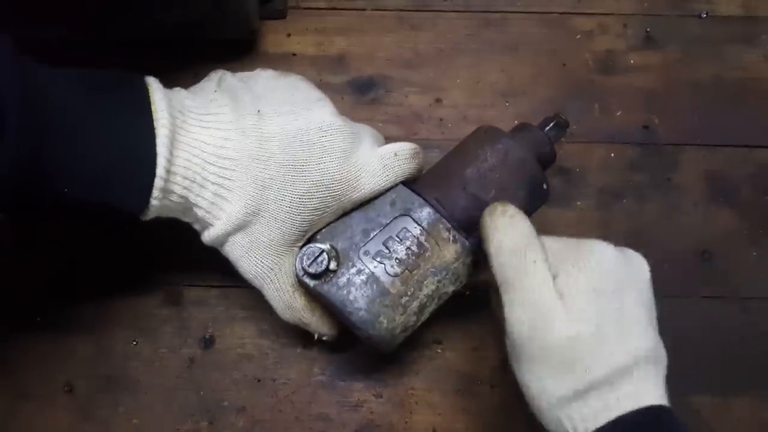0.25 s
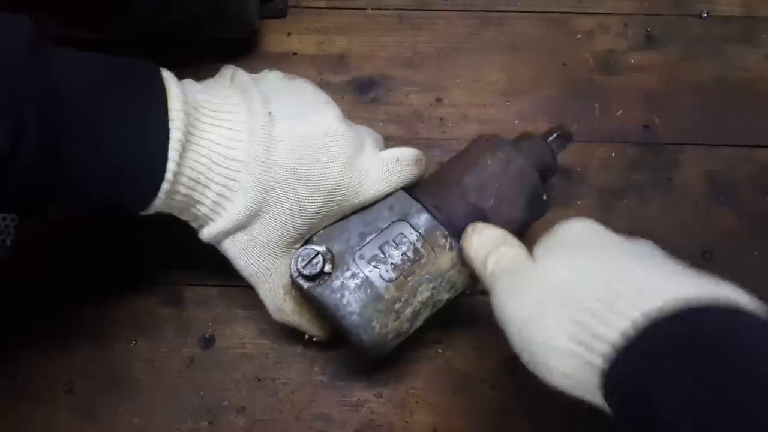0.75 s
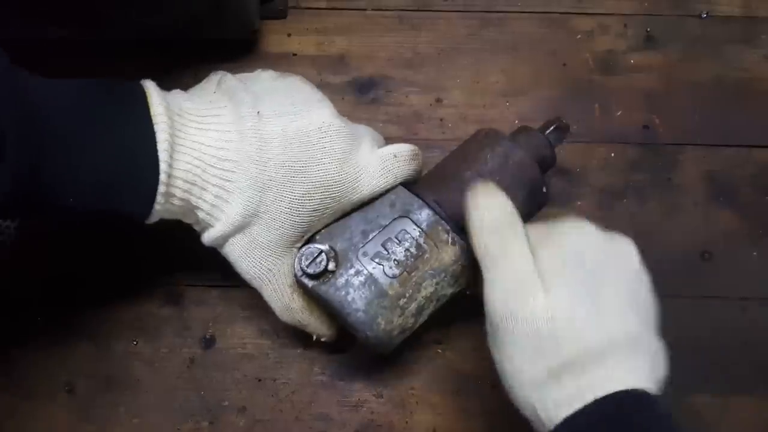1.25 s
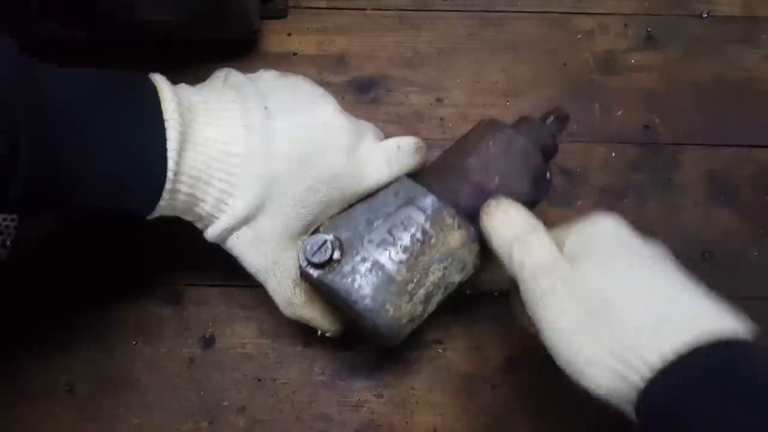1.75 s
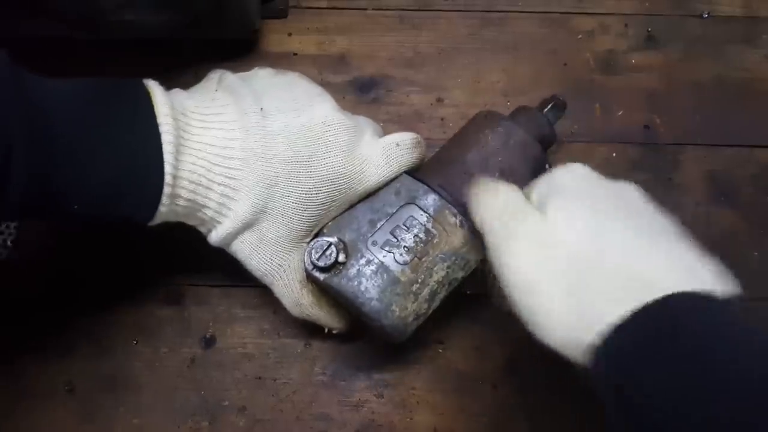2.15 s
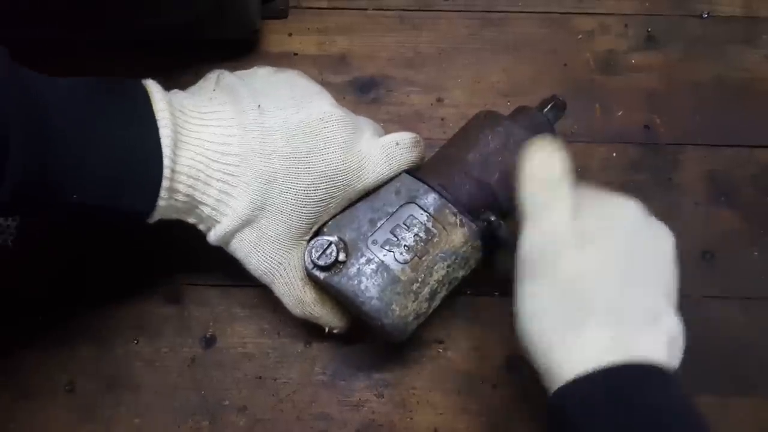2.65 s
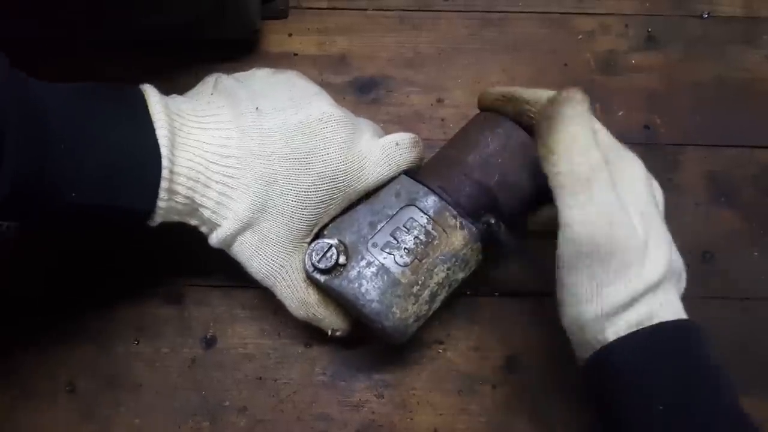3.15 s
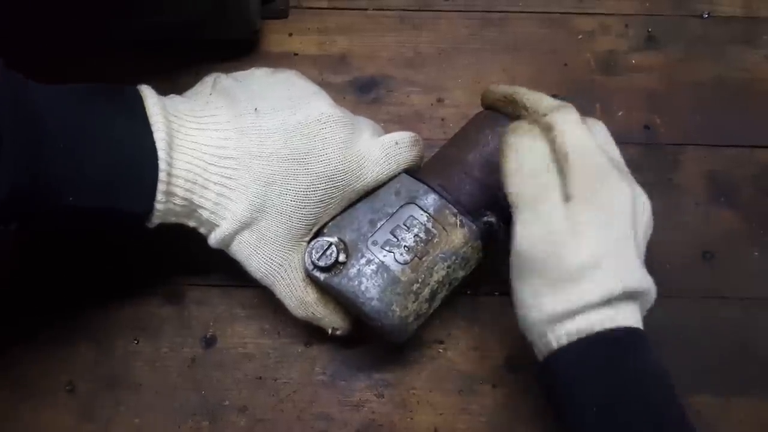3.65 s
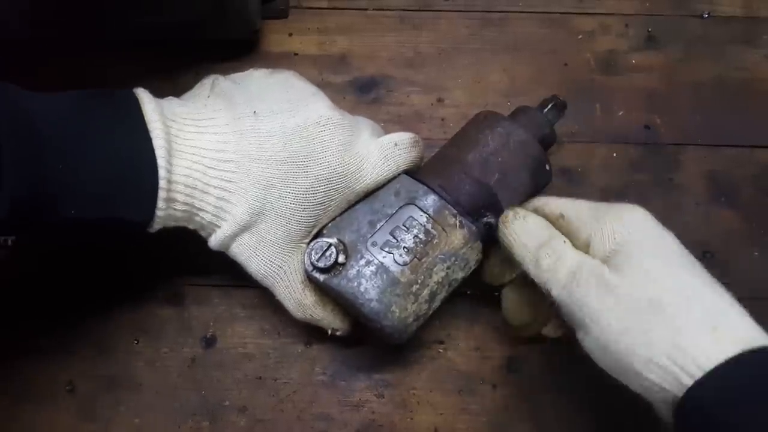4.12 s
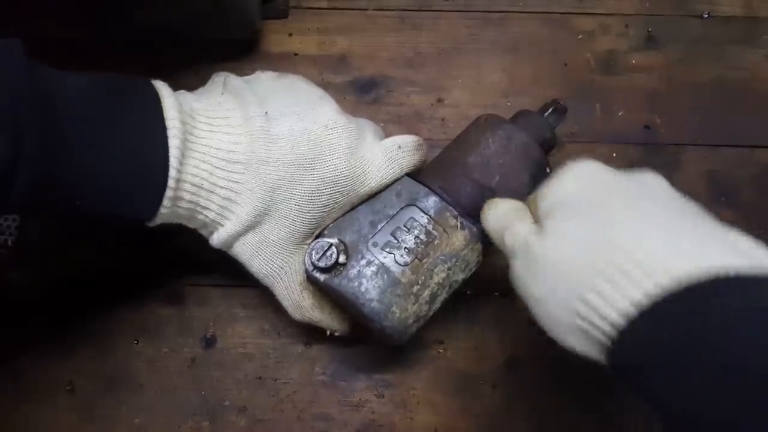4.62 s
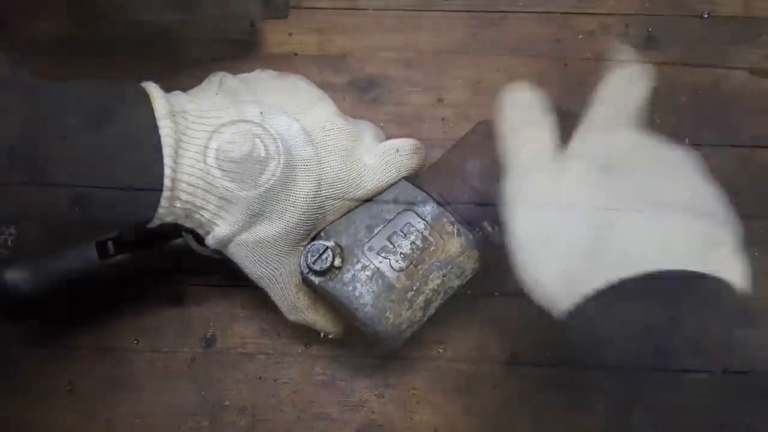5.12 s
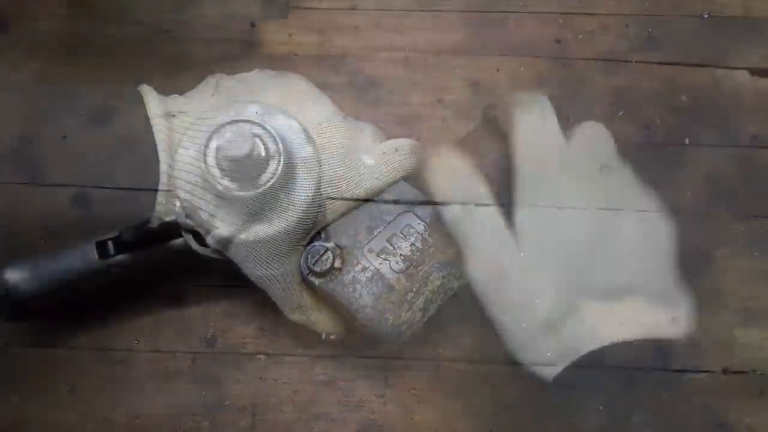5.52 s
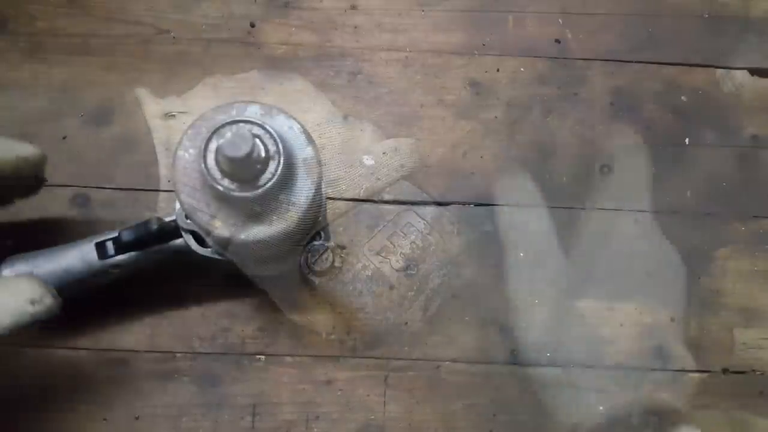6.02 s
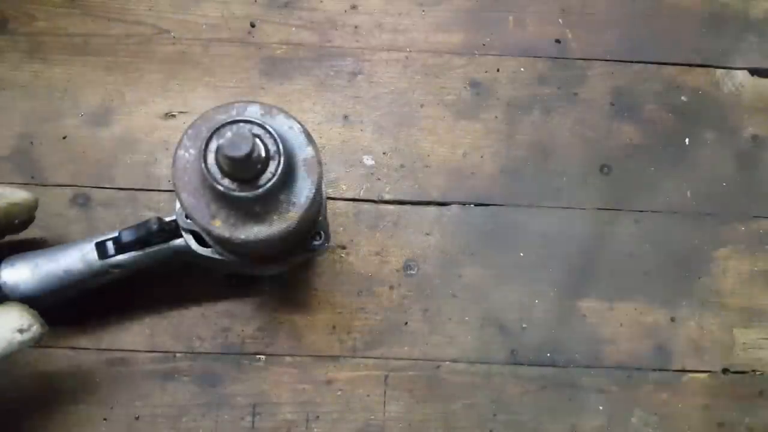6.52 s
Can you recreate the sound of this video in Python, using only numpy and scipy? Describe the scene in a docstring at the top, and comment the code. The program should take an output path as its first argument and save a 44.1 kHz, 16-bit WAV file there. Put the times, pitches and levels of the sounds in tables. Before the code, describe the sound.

A heavy rusty metal tool is handled on a wooden bench, heard close and slightly to the right. Cotton hiss and low gritty scraping run throughout, with dull bench thuds, dry ticks on metal and faint high squeaks. Two strong drops come in the first two seconds, the second clattering with loose steel; later activity thins, apart from a bright snap and a last drop, leaving quiet hum.

```python
"""Gloved hands pry at a rusty impact wrench on a wooden workbench, close to the microphone, for 6.8 seconds.
From the first moment mains hum and still air lie under rubbing gloves, grinding rust and a small tapping tool.
The wrench soon tips and drops; its second drop, just before 2 s, is the hardest and makes loose steel rattle.
Knocks, taps, snaps and squeaks go on; after a last drop at 4.5 s the work calms and the low hum swells.
Blows ring the modes of bench, housing and steel; rubbing is coloured noise, squeaks narrow noise, hum sines."""
import sys
import numpy as np
from scipy import signal
from scipy.io import wavfile

SR = 44100
rng = np.random.default_rng(int(sys.argv[2]) if len(sys.argv) > 2 else 0)


def generate_wav(signal):
    """Clip the signal to [-1, 1] and save it as 16-bit WAV at the path in sys.argv[1]."""
    frames = np.transpose(np.atleast_2d(signal))
    scaled = np.clip(frames, -1, 1) * 32767
    pcm = np.round(scaled).astype(np.int16)
    wavfile.write(sys.argv[1], SR, pcm)


N = 298557  # length in samples
CUTOFF_HZ = 15900  # nothing is kept above this pitch


def from_db(db):
    """Turn decibels into a gain."""
    return 10 ** (np.asarray(db) / 20)


def rms_one(x):
    """Scale a sound to unit power."""
    return x / np.sqrt(np.mean(x ** 2) + 1e-20)


def in_time(rows):
    """Read a table of (time, value) at every sample, with straight lines between its points."""
    return np.interp(np.arange(N) / SR, *np.transpose(rows))


def at_hz(points, hz):
    """Read a table of (pitch, value) on a log-frequency axis."""
    freqs, values = np.transpose(points)
    return np.interp(np.log(hz), np.log(freqs), values)


def pan(x, right_db):
    """Lean a sound to the right: the right side is louder than the left by right_db."""
    return x * from_db(np.array([[-right_db], [right_db]]) / 2)


def drift(rate):
    """Wander by chance with spread 1, heading for a new random value `rate` times a second."""
    knots = rng.standard_normal(4000)
    return rms_one(np.interp(np.arange(N) / SR * rate, np.arange(len(knots)), knots))


def swell(start, length):
    """A stroke rises and falls like half a sine."""
    t = np.arange(N) / SR - start
    during = (t > 0) & (t < length)
    shape = np.zeros(N)
    shape[during] = np.sin(np.pi * t[during] / length)
    return shape


def ring(force, hz, t60):
    """One mode: a unit click sets a sine of height 1 ringing, which falls 60 dB in t60 seconds."""
    radius = from_db(-60 / (t60 * SR))
    angle = 2 * np.pi * hz / SR
    return signal.lfilter([0, np.sin(angle)], [1, -2 * radius * np.cos(angle), radius ** 2], force + 1e-18)


def body(force, modes):
    """An object rings in all its modes at once, neighbours in opposite phase."""
    return sum((-1) ** k * from_db(db) * ring(force, hz, t60) for k, (hz, db, t60) in enumerate(modes))


def contacts(rows, size=2048, order=2):
    """Force pulses from (s, dB, cut-off Hz): the softer the contact, the lower its cut-off and the wider the pulse."""
    force = np.zeros(N + size)
    click = signal.unit_impulse(size)
    for s, db, hz in rows:
        at = max(0, round(s * SR))
        low_pass = signal.butter(order, min(hz, SR / 2 - 1), fs=SR)
        force[at:at + size] += from_db(db) * signal.lfilter(*low_pass, click)
    return force[:N]


# how alike left and right are in noise and reflected sound: pitch_hz, likeness (0 unrelated, 1 the same)
LIKENESS = [(60, 0.52), (200, 0.91), (400, 0.8), (800, 0.192), (2000, 0), (6000, 0.2), (15000, 0)]


def noise_bands(length):
    """Half-octave bands of stereo noise, much alike in the bass and nearly unrelated in the treble."""
    edges = 22 * 2 ** np.arange(0, 9.6, .5)
    white = rng.standard_normal((2, 2, length))
    for k, (low, high) in enumerate(zip(edges, edges[1:])):
        band_pass = signal.butter(2, [low, high], "band", fs=SR, output="sos")
        # neighbouring bands come from separate noises
        mid, side = signal.sosfilt(band_pass, white[k % 2])
        hz = np.sqrt(low * high)
        alike = np.clip(at_hz(LIKENESS, hz), -1, 1)
        yield hz, np.sqrt((1 + alike) / 2) * mid + np.sqrt((1 - alike) / 2) * np.array([side, -side])


def coloured(spectrum, shift_db, shift_rate=14):
    """Stereo noise of a given colour and unit power, whose bands each wander on their own."""
    return rms_one(sum(band * from_db(at_hz(spectrum, hz) + shift_db * drift(shift_rate))
                       for hz, band in noise_bands(N)))


# how long the dense ringing takes to fall 60 dB: pitch_hz, t60_s
RING_T60 = [(60, 0.52), (220, 0.28), (600, 0.31), (2000, 0.23), (6000, 0.4), (14000, 0.36)]


def diffuse(x, colour, build_s):
    """Countless weak resonances and reflections build up, then die away band by band."""
    t = np.arange(SR) / SR
    tail = sum(band * from_db(at_hz(colour, hz) - 60 * t / at_hz(RING_T60, hz))
               for hz, band in noise_bands(SR))
    build_up = 1 - np.exp(-t / build_s)
    return signal.fftconvolve(x[None], tail * build_up, axes=1)[:, :N]


# colour of the sound that the workshop sends back: pitch_hz, level_db
WORKSHOP = [(200, -41), (1000, -38.5), (3000, -35), (6000, -37), (9000, -45), (15000, -62.5)]


def workshop(x, build_s):
    """The workshop answers a sound with a dense, fading tail."""
    return diffuse(x, WORKSHOP, build_s)


# tones of the mains hum: pitch_hz, level_db (rms, before panning)
HUM = [(100, -69), (400, -83.5), (500, -78), (900, -84.5), (1001, -84), (1400, -92.5), (1501, -81.5),
       (2002, -88), (2600, -88.5), (2702, -86.5)]
# swell of the lowest hum tone: time_s, change_db
HUM_SWELL = [(0, 2), (5.9, -0.5), (6.3, 3.5), (6.75, 3.5)]
# colour of the still air: pitch_hz, level_db (per Hz, only the shape counts)
AIR = [(25, -14), (60, 3), (110, -11.5), (200, -9), (300, -23.5), (700, -16.5), (1500, -18), (2800, -19.5),
       (4500, -28.5), (8000, -38), (15500, -35)]
AIR_DB, AIR_SHIFT_DB = -68.5, 1.2  # rms level before panning; how far the colour wanders


def background():
    """Mains hum is a row of steady sines over the noise of still air; its lowest tone swells near the end."""
    t = np.arange(N) / SR
    tones = []
    for hz, db in HUM:
        level = np.sqrt(2) * from_db(db + 1.4 * drift(9.9))
        tones.append(level * np.sin(2 * np.pi * (hz * t + rng.random())))
    hum = tones[0] * from_db(in_time(HUM_SWELL)) + sum(tones[1:])
    air = from_db(AIR_DB) * coloured(AIR, AIR_SHIFT_DB)
    return pan(hum + air, right_db=4.0)


# how hard the hands work the wrench against the bench: time_s, effort_db (above the usual)
EFFORT = [(0, 5.5), (.17, 1.5), (.31, 3.5), (.38, -13.5), (.66, 2.5), (.76, -0.5), (.84, 14), (.97, 12),
          (1.08, -7.5), (1.36, 7.5), (1.56, -5.5), (1.82, -0.5), (2.1, 10.5), (2.3, -3), (2.45, -3.5),
          (2.52, 7.5), (2.72, 1), (2.95, 2), (3.25, 2), (3.65, -10), (4.05, 0), (4.45, -6.5), (4.62, 4.5),
          (5.18, -10.5), (5.35, -1), (5.9, -8.5), (6.0, -15.5), (6.77, -7.5)]


def effort_db(s):
    """Effort above the usual, at the given times."""
    return np.interp(s, *np.transpose(EFFORT))


# a glove slides over the wrench: start_s, length_s, hiss_db (before the final trim)
STROKES = [(0.482, 0.052, -59.5), (0.521, 0.12, -68.5), (0.984, 0.21, -63.5), (1.534, 0.15, -64),
           (2.107, 0.22, -76), (2.53, 0.2, -68), (2.681, 0.15, -52.5), (2.775, 0.23, -57),
           (3.006, 0.2, -74), (3.2, 0.29, -66.5), (3.737, 0.14, -60), (3.872, 0.28, -62.5),
           (4.233, 0.093, -50), (4.966, 0.16, -71.5), (5.992, 0.13, -74.5), (6.544, 0.24, -76)]
# colour of the cotton gloves: pitch_hz, level_db (per Hz, only the shape counts)
GLOVE = [(700, -18.5), (1400, -1), (3100, 16), (5000, 12), (8000, 15), (10000, 3.5), (13500, 3),
         (15500, -6)]
# colour of the grinding rust: pitch_hz, level_db (per Hz, only the shape counts)
RUST = [(50, -8), (130, 8.5), (220, 3), (300, 3), (450, 0.5), (700, -8), (1200, -9), (2500, -14.5),
        (5000, -39.5)]
GLOVE_SHIFT_DB, RUST_SHIFT_DB = 2.0, 4.0  # how far each colour wanders
# levels before the final trims: at the usual effort, and how much of the effort's swing each follows
RUSTLE_DB, RUSTLE_FOLLOWS = -72, 0.31
GRIND_DB, GRIND_FOLLOWS = -64.5, 1.15
STROKE_GRIND_DB = -4.5  # grinding that a stroke brings, against its hiss, before the trims
# after a drop the wrench skids: hiss and grinding against the force of the drop, before the trims
SKID_HISS_DB, SKID_GRIND_DB, SKID_S = -51, -39.5, 0.095


def friction(fibre_db=2.0, grit_db=3.0):
    """Cotton hisses as its fibres catch; rust grinds lower and coarser; both follow effort, strokes and skids."""
    effort = effort_db(np.arange(N) / SR)
    sliding = sum(from_db(db) * swell(start, length) for start, length, db in STROKES)
    skidding = sum(from_db(db) * swell(s, SKID_S) for s, db, *rest in DROPS)

    hiss = from_db(RUSTLE_DB + RUSTLE_FOLLOWS * effort)
    hiss = hiss + sliding + from_db(SKID_HISS_DB) * skidding
    grind = from_db(GRIND_DB + GRIND_FOLLOWS * effort)
    grind = grind + from_db(STROKE_GRIND_DB) * sliding + from_db(SKID_GRIND_DB) * skidding

    # fast random flicker makes the fibres and the grit
    gloves = rms_one(coloured(GLOVE, GLOVE_SHIFT_DB) * from_db(fibre_db * drift(270)))
    rust = rms_one(coloured(RUST, RUST_SHIFT_DB) * from_db(grit_db * drift(120)))
    # the final trims
    gloves_out = gloves * hiss * from_db(-2.5)
    rust_out = rust * grind * from_db(4.5)
    return pan(gloves_out, right_db=3.0) + pan(rust_out, right_db=2.5)


# sticking surfaces squeak: start_s, length_s, pitch_hz, width_hz, level_db
SQUEAKS = [(0.212, 0.12, 7780, 350, -73), (0.489, 0.043, 634, 108, -53.5), (1.272, 0.13, 7770, 350, -70.5),
           (1.85, 0.043, 7650, 350, -69), (2.473, 0.12, 7620, 340, -75), (2.575, 0.31, 388, 140, -56.5),
           (3.796, 0.079, 407, 40.3, -54.5), (3.801, 0.054, 1090, 400, -59.5),
           (4.497, 0.29, 7800, 356, -74), (5.56, 0.13, 7900, 353, -78.5)]


def squeaks():
    """Uneven stick and slip, as noise, drives one narrow resonance that swells and fades with the stroke."""
    out = 0
    for start, length, hz, width, db in SQUEAKS:
        resonance = signal.butter(2, [hz - width / 2, hz + width / 2], "band", fs=SR, output="sos")
        stroke = swell(start, length)
        tone = signal.sosfilt(resonance, rng.standard_normal(N))
        out = out + from_db(db) * stroke * tone / tone[stroke > 0].std()
    return pan(out, right_db=8.5)


# the steel tip slips off an edge: time_s, force_db
SNAPS = [(0.7778, -35), (0.7940, -39), (0.926, -43), (1.151, -46.5), (1.8906, -42), (2.049, -50.5),
         (2.5912, -45), (3.936, -45.5), (4.2736, -22), (4.5395, -46.5)]
# ringing modes of the tip: pitch_hz, level_db, t60_s
TIP = [(2380, -8, 0.0071), (5325, -3.5, 0.014), (5900, -5, 0.013), (6640, -7, 0.011), (7830, -4.5, 0.028),
       (8650, -6.5, .02), (11700, -15, 0.011)]


def snaps(contact_hz=14000, crunch_s=0.0008, ring_growth=0.33):
    """The tip lets go with a bright, short ring as rust crumbles for a moment; light slips ring relatively less."""
    hardest_db = max(db for s, db in SNAPS)
    force = contacts([(s, db, contact_hz) for s, db in SNAPS])
    ringing = contacts([(s, db + ring_growth * (db - hardest_db), contact_hz) for s, db in SNAPS])

    # each slip sets off a tiny burst of fading noise
    t = np.arange(SR // 20) / SR
    crumbs = rng.standard_normal(SR // 20) * np.exp(-t / crunch_s)
    bright = signal.butter(2, [2400, 13000], "band", fs=SR)
    crunch = signal.lfilter(*bright, signal.fftconvolve(force, crumbs)[:N])

    dry = body(ringing, TIP) * from_db(-2) + crunch * from_db(-2)
    return pan(dry, right_db=8.0) + workshop(dry, build_s=0.0042) * from_db(-7.5)


# the tool taps the rusty housing, which passes a thud on to the bench:
# time_s, tick_force_db, contact_cutoff_hz, thud_force_db
TAPS = [(0.0839, -38.5, 3720, -30.5), (0.29, -34.5, 2580, -36), (0.6313, -41, 4000, -34.5),
        (0.816, -23, 1360, -46), (1.139, -42, 3500, -29), (1.323, -43, 2960, -29.5),
        (1.3946, -28.5, 3170, -27), (1.7807, -39.5, 2330, -35.5), (1.862, -46.5, 3020, -53),
        (2.360, -48, 2510, -33.5), (2.563, -36.5, 2530, -47), (3.306, -41.5, 2500, -58),
        (3.5228, -46, 3020, -32.5), (3.6738, -31.5, 1103, -45), (4.7299, -44.5, 2420, -54),
        (5.659, -45, 897, -46), (5.698, -53.5, 2520, -39.5)]
# ringing modes of the housing: pitch_hz, level_db (before a common trim), t60_s
HOUSING = [(830, -1, 0.00887), (1090, -4, 0.021), (1600, 0, 0.0055), (2380, -3, 0.012),
           (3160, -0.5, 0.0067), (4500, 4, 0.0048)]


def taps(spot_db=2.5):
    """Dry ticks on the housing, damped by the hand that holds it; each spot favours other modes."""
    spots = spot_db * rng.uniform(-1, 1, (len(TAPS), len(HOUSING)))
    dry = 0
    for k, (mode_hz, mode_db, t60) in enumerate(HOUSING):
        rows = [(s, db + spot, hz) for (s, db, hz, thud_db), spot in zip(TAPS, spots[:, k])]
        force = contacts(rows, order=3)
        dry = dry + (-1) ** k * from_db(mode_db - 6.0) * ring(force, mode_hz, t60)
    return pan(dry + workshop(dry, build_s=0.0014) * from_db(3.4), right_db=7.5)


# ringing modes of the loose steel parts: pitch_hz, level_db (before a common trim), t60_s
LOOSE_PARTS = [(1336, -3, .16), (1580, -5, .1), (1824, -5, .14), (2031, -1, .14), (2337, -3, .14),
               (2681, -8, .12), (3391, -12, .12), (3828, -15, .14), (5615, -20, .15), (6686, -18, .17),
               (7822, -13, .1), (8856, -7, .14), (11490, -15, .11), (12210, -20, .14), (13920, -17, .15),
               (15716, -19, .12)]
# parts thrown up by the hardest drop land in one shower that holds briefly and dies away
RATTLE_START_S, RATTLE_HOLD_S = 1.908, 0.027
RATTLE_FORCE_DB, RATTLE_FALL_DB_PER_S = -27, 617.5
BOUNCE_S, BOUNCE_FALL_DB = 0.013, 15.5  # the parts land in waves, each fading before the next
SMALL_PARTS_PITCH, SMALL_PARTS_DB = 1.15, -9  # smaller parts ring higher (ratio) and more faintly


def rattle(per_s=1100, clack_hz=2400):
    """Loose steel lands again in a shower of random contacts; each side hears its own mix of them."""
    t = np.arange(N) / SR - RATTLE_START_S
    fall_db = RATTLE_FALL_DB_PER_S * np.clip(t - RATTLE_HOLD_S, 0, 1)
    wave_db = BOUNCE_FALL_DB * (t / BOUNCE_S % 1)
    shower = (t > 0) * from_db(RATTLE_FORCE_DB - fall_db - wave_db)
    sizes = rng.uniform(0.745, 1, (2, N)) * rng.choice([-1, 1], (2, N))
    force = sizes * (rng.random((2, N)) < per_s / SR) * shower

    small = [(hz * SMALL_PARTS_PITCH, db + SMALL_PARTS_DB, t60)
             for hz, db, t60 in LOOSE_PARTS if hz * SMALL_PARTS_PITCH < CUTOFF_HZ]
    steel = np.array([body(side, LOOSE_PARTS + small) for side in force]) * from_db(-9.0)

    # each landing also cracks against steel and clacks on the wood
    crack_band = signal.butter(2, [3000, 6500], "band", fs=SR, output="sos")
    clack_band = signal.butter(2, [500, clack_hz], "band", fs=SR, output="sos")
    crack = signal.sosfilt(crack_band, force) * from_db(7)
    clack = signal.sosfilt(clack_band, force) * from_db(31)
    hits = clack + crack
    echo = workshop(hits.mean(axis=0), build_s=0.004) * from_db(3.0)
    return steel + pan(hits + echo, right_db=3.5)


# under effort the wrench also shifts in small random nudges: rate, force, random spread either way,
# middle contact cut-off, and how much of the effort's swing they follow
NUDGES_PER_S, NUDGE_DB, NUDGE_SPREAD_DB, NUDGE_HZ, NUDGE_FOLLOWS = 22, -51, 5.5, 320, 1.5


def nudges(count=200):
    """Small soft blows at random times, stronger with more effort."""
    draws = rng.random((count, 3))
    times = np.cumsum(.5 + draws[:, 0]) / NUDGES_PER_S
    spread_db = NUDGE_SPREAD_DB * (2 * draws[:, 1] - 1)
    levels = NUDGE_DB + NUDGE_FOLLOWS * effort_db(times) + spread_db
    cutoffs = NUDGE_HZ * 2 ** (draws[:, 2] - .5)
    return [(s, db, hz, 0) for s, db, hz in zip(times, levels, cutoffs) if s < N / SR]


# the hands bump the wrench against the boards: time_s, force_db, contact_cutoff_hz,
# sway_db (of the bench top, against the force)
KNOCKS = [(0.259, -32, 223, 2), (0.885, -30, 500, -1), (1.204, -34, 245, -1), (1.307, -27, 256, -2),
          (1.731, -35, 353, -2), (2.042, -17.5, 950, -6), (2.076, -24.5, 775, -18), (2.1, -24, 850, 3),
          (2.937, -33.5, 376, 4.5), (3.125, -32, 275, -3.5), (3.198, -34.5, 397, -5),
          (3.929, -45.5, 660, 10), (4.277, -36.5, 655, -6.5), (4.433, -39.5, 420, 5),
          (4.8615, -27.5, 580, 1), (5.246, -39.5, 320, 10.5), (5.607, -38, 378, -2.5),
          (5.821, -39, 299, -2.5), (5.904, -42, 398, -13)]
# the wrench tips over and drops on the bench: time_s, force_db, contact_cutoff_hz, sway_db,
# second_edge_delay_s, second_edge_db, rocking_back_db, frame_boom_db
DROPS = [(0.7661, -9, 970, -7, 0.0085, -11.5, -26, -24.5),
         (1.8904, -0.5, 1550, 0.5, 0.01305, -17, -39, -32), (4.5317, -13, 680, 2, 0.00827, -26, -44.5, -50)]
EDGE_HZ = 720  # contact cut-off of the second edge
# the body rocks back after a steady interval: delay, contact cut-off, sway
ROCK_S, ROCK_HZ, ROCK_SWAY_DB = 0.176, 348, 12.5
# a tap's thud reaches the bench a little later: delay, contact cut-off, sway
THUD_LAG_S, THUD_HZ, THUD_SWAY_DB = 0.002, 394, -3


def blows():
    """Every blow on the bench as (s, dB, cut-off Hz, sway dB); a drop lands on two edges, then rocks back."""
    rows = list(KNOCKS) + nudges()
    for s, db, hz, sway, edge_s, edge_db, rock_db, boom_db in DROPS:
        rows.append((s, db, hz, sway))
        rows.append((s + edge_s, edge_db, EDGE_HZ, sway))
        rows.append((s + ROCK_S, rock_db, ROCK_HZ, ROCK_SWAY_DB))
    thuds = [(s + THUD_LAG_S, thud_db, THUD_HZ, THUD_SWAY_DB) for s, db, hz, thud_db in TAPS]
    return rows + thuds


# ringing modes of the bench, the sway of its top first: pitch_hz, level_db, t60_s
BENCH = [(64.7, -33, 0.16), (97.6, -20, 0.2), (129.2, -10, 0.28), (164.4, -11, 0.1666), (211.3, -5.5, 0.14),
         (215.3, -37, 0.07), (307.8, -19.5, 0.084), (356, -18.5, 0.16), (427.8, -6, 0.033),
         (434.6, -27, 0.174), (478, -28, 0.1698), (595.7, -18.5, 0.16), (636, -12.5, 0.074),
         (627.5, -10, 0.028), (812, -27, 0.19), (787, -13.5, 0.014), (1070, -9, 0.016), (1024, -29, 0.24),
         (1168, -38.5, 0.21)]
# colour of the dense ringing of the boards after a blow: pitch_hz, level_db
BOARDS = [(50, -23), (120, -7), (210, 6), (290, -11), (500, 2.5), (800, -19), (1300, -7.5), (2500, -2.5),
          (5000, -4), (14000, -28.5)]
FRAME_HZ, FRAME_T60_S = 75.3, 0.26  # the boom of the bench frame


def knocks(count=3, low_cut_hz=52):
    """Blows ring the bench; its lowest modes, the sway of the whole top, depend on where they land."""
    rows = blows()
    force = contacts([(s, db, hz) for s, db, hz, sway in rows], order=4)
    swaying = contacts([(s, db + sway, hz) for s, db, hz, sway in rows], order=4)
    booming = contacts([(s, boom_db, EDGE_HZ) for s, *rest, boom_db in DROPS])

    wood = body(force, BENCH[count:]) - body(swaying, BENCH[:count])
    wood = wood - ring(booming, FRAME_HZ, FRAME_T60_S)
    # the deepest bass is filtered away
    wood = signal.sosfilt(signal.butter(2, low_cut_hz, "high", fs=SR, output="sos"), wood)
    return pan(diffuse(force, BOARDS, build_s=0.0013) + wood, right_db=3.5)


def scene():
    """Everything that sounds at the bench, from the background to the knocks."""
    return background() + friction() + squeaks() + snaps() + taps() + rattle() + knocks()


def record(dry):
    """Full scale limits the peaks, then a steep filter cuts the top."""
    top_cut = signal.ellip(10, .1, 80, CUTOFF_HZ, fs=SR, output="sos")
    return signal.sosfilt(top_cut, np.clip(dry, -1, 1))


dry = scene()
out = record(dry)
generate_wav(out)
```